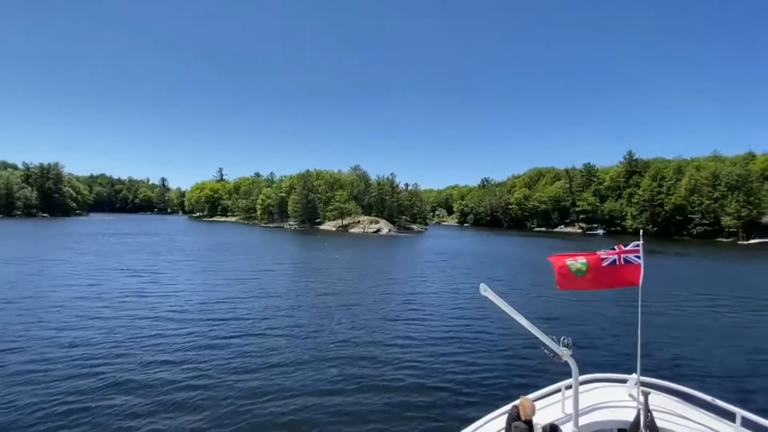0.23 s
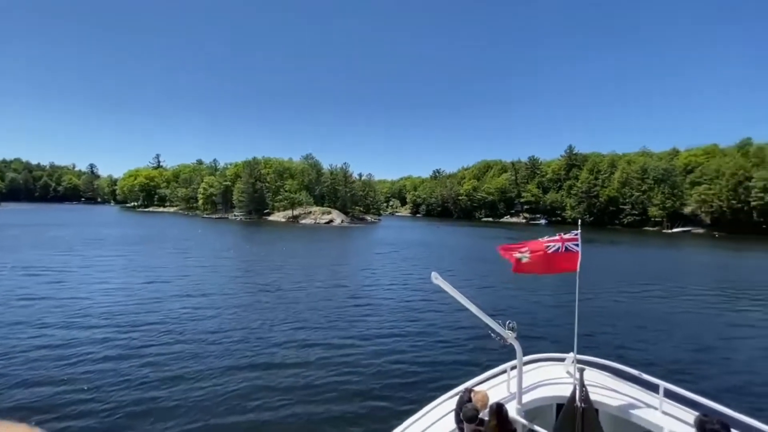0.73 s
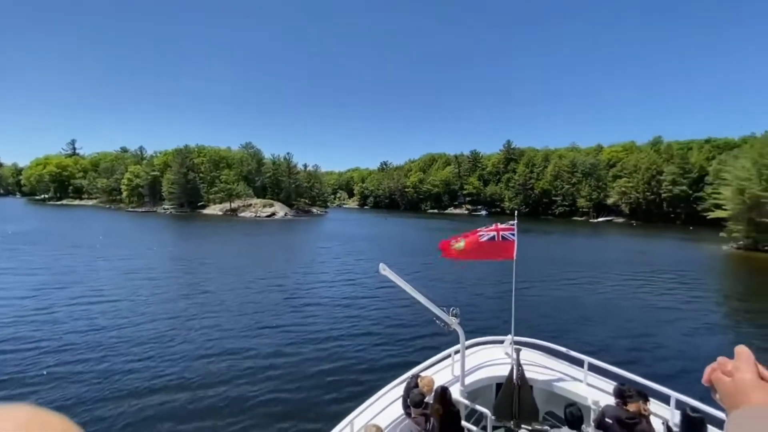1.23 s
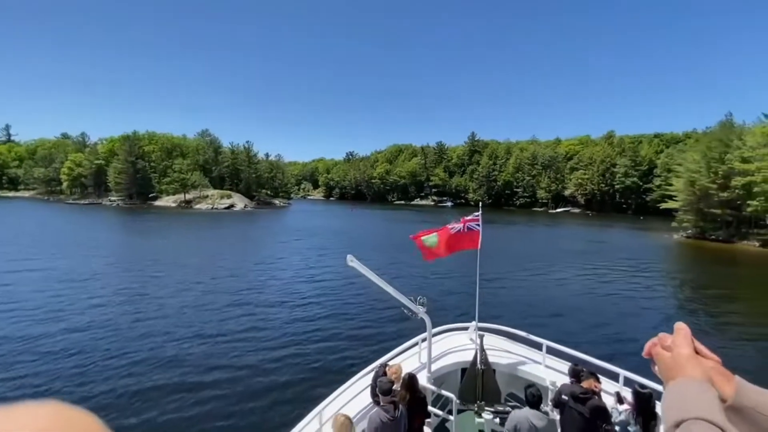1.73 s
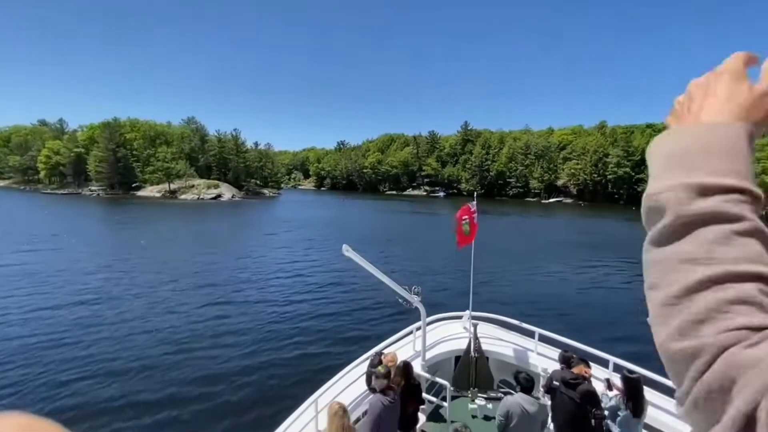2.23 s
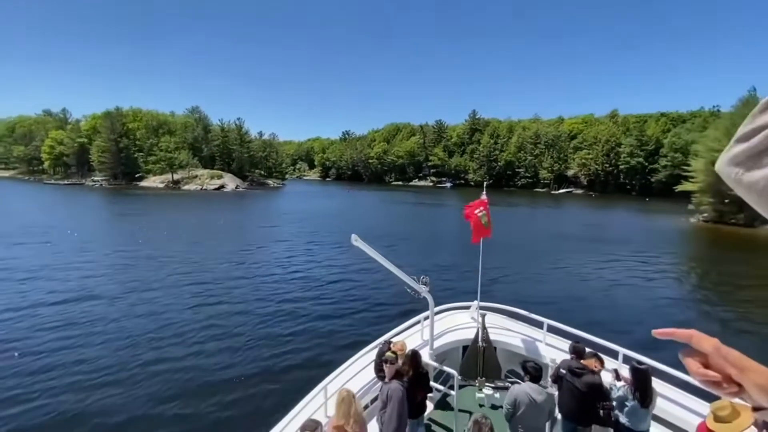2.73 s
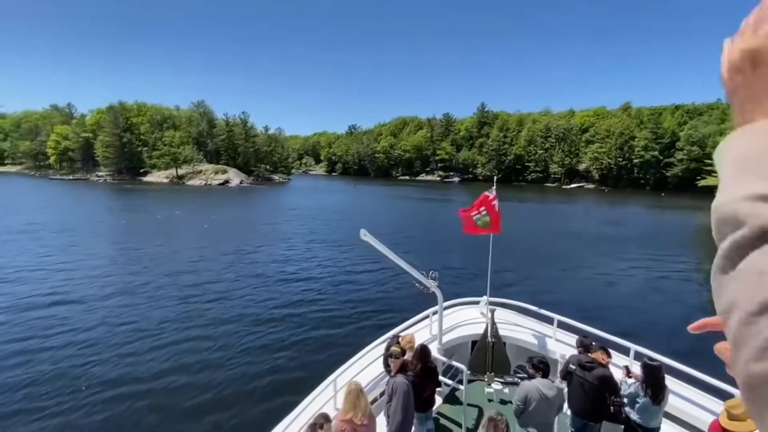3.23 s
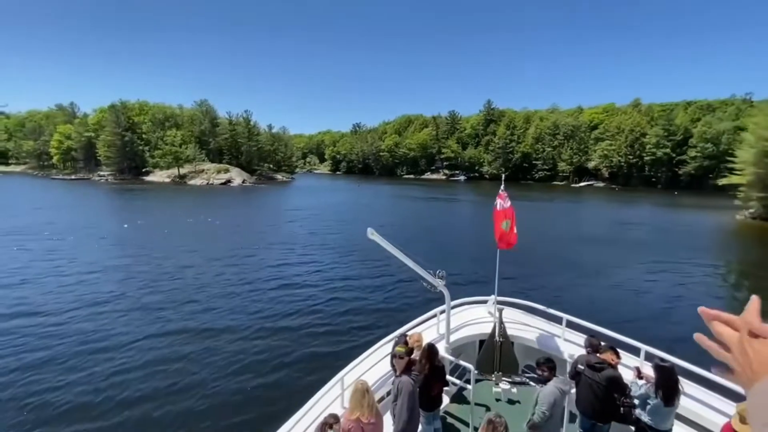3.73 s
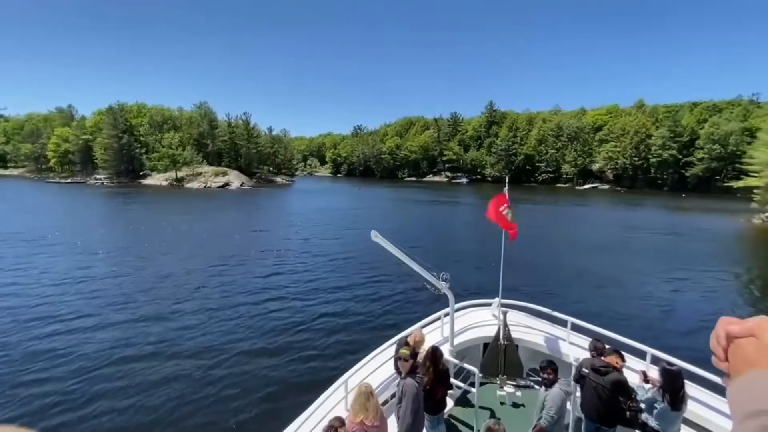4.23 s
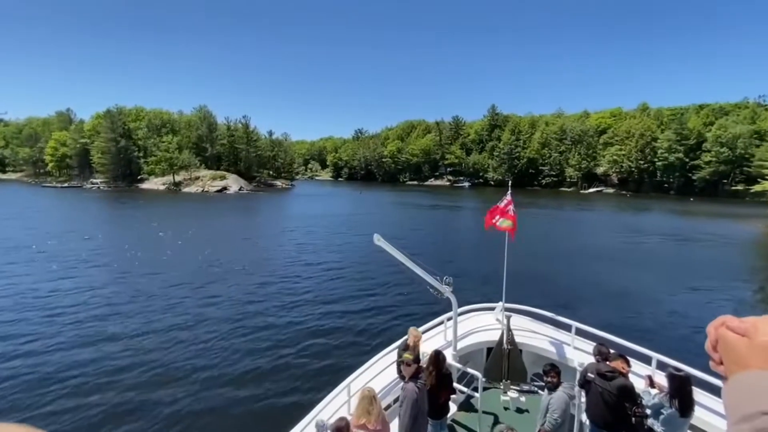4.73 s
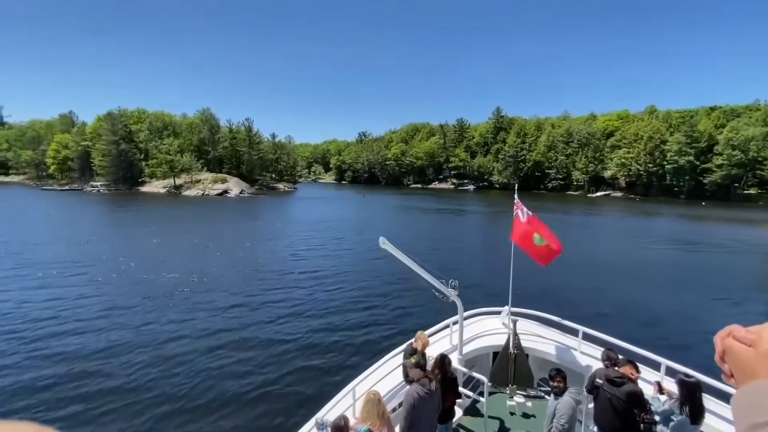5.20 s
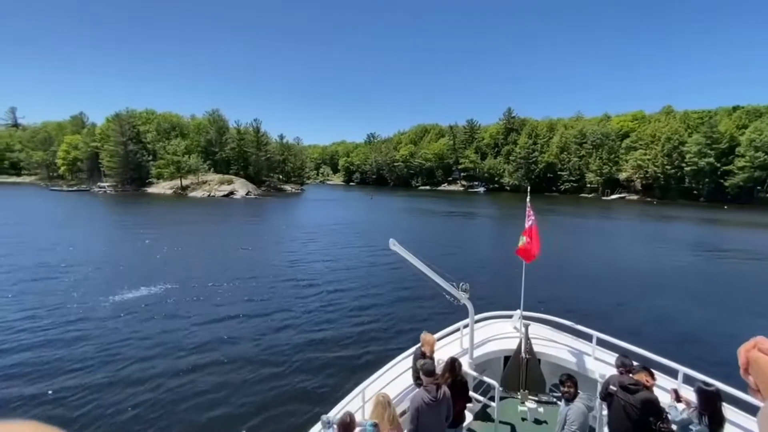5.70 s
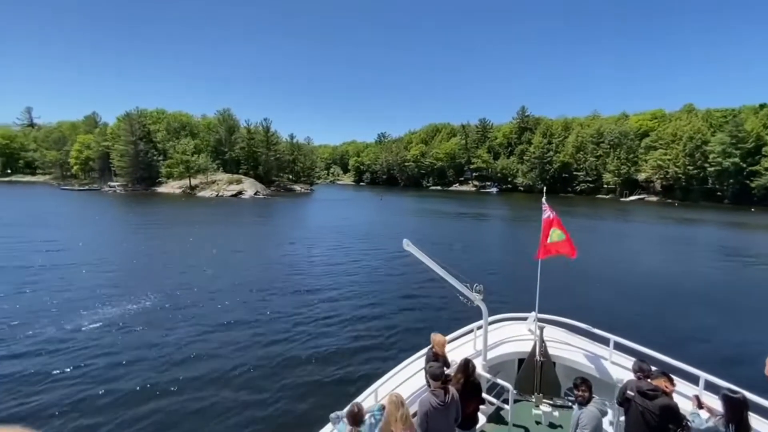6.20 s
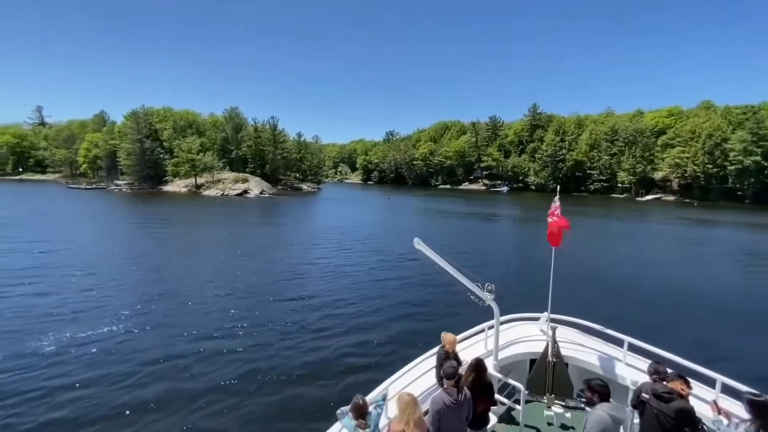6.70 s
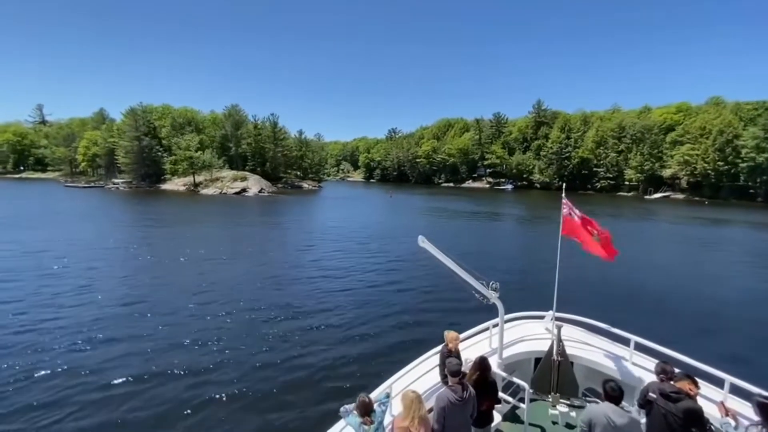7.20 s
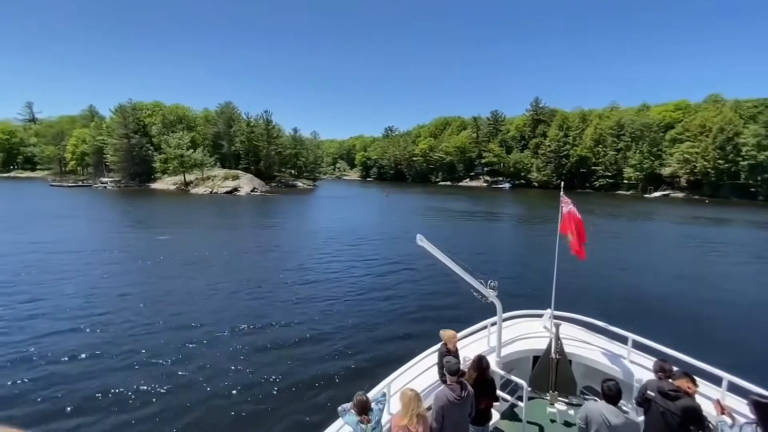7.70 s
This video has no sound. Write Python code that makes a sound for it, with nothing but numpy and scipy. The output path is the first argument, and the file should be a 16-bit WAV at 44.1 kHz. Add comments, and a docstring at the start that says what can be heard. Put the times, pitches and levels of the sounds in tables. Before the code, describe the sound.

A boat's air horn holds one long, loud, brassy chord over open water, with a light breeze on the microphone.

```python
"""From the start, a three-trumpet air horn holds one long chord on a tour boat crossing a lake.
Each trumpet sounds a stack of pure tones (partials); in the loud air they breed sum tones and steepen into
rasping shocks that scatter off the deck, while compressed air rushes underneath. The listener turns and the
treble moves in from the left. A breeze gusts on the microphone, and at 2.2 s a sleeve brushes by. The blast
slowly loses its edge. The whole sound skips for an instant at 7.5 s, with a tick and a dull knock."""
import sys
import numpy as np
from scipy import signal
from scipy.fft import rfft, irfft, next_fast_len
from scipy.io import wavfile
from scipy.ndimage import map_coordinates

SR = 44100
rng = np.random.default_rng(int(sys.argv[2]) if len(sys.argv) > 2 else 0)


def unload_audio(sound):
    """Save the sound as a 16-bit wav file, at the path given as the first command line argument."""
    columns = np.transpose(np.atleast_2d(sound))
    # keep every value between -1 and 1, then stretch to whole-number steps
    steps = np.round(np.clip(columns, -1, 1) * 32767)
    wavfile.write(sys.argv[1], SR, steps.astype(np.int16))


N = 350595
TIME = np.arange(N) / SR


def from_db(db):
    """Turn decibels into a number to multiply by."""
    return np.exp(np.asarray(db) * (np.log(10) / 20))


def rms_one(x):
    """Scale a sound so that its average power is 1."""
    return x / np.sqrt(np.mean(x ** 2) + 1e-20)


def in_time(rows):
    """Join a table's points with straight lines: one value per sample for each column after the time."""
    times, *columns = np.transpose(rows)
    return [np.interp(TIME, times, column) for column in columns]


def swing(curve):
    """How many dB a level curve lies above its own average power, at every sample."""
    db, = in_time(curve)
    return db - 10 * np.log10(np.mean(from_db(db) ** 2))


def pan(balance_db):
    """Left and right gains that keep the average power; a positive balance favours the left."""
    return rms_one(from_db([[balance_db / 2], [-balance_db / 2]]))


def drift(rate):
    """A smooth random wobble of typical size 1 that changes about `rate` times a second."""
    pole = np.exp(-200 * np.pi * rate / SR)
    noise = rng.standard_normal(N // 100 + 2002)   # one value per 100 samples, plus a run-up
    slow = signal.lfilter([1], [1, -2 * pole, pole * pole], noise)[2000:]
    return np.interp(np.arange(N) / 100, np.arange(len(slow)), rms_one(slow))


def coloured(x, spectrum):
    """Turn each frequency up or down as a table says, then scale to power 1."""
    size = next_fast_len(N)
    hz, db = np.transpose(spectrum)
    bin_hz = np.maximum(np.arange(size // 2 + 1) * SR / size, 1)
    gain = from_db(np.interp(np.log(bin_hz), np.log(hz), db))
    return rms_one(irfft(rfft(x, size) * gain, size)[..., :N])


def stereo_noise(likeness):
    """Hiss for two ears: unrelated at likeness 0, the same at 1."""
    mid, side = rng.standard_normal((2, N))
    return np.sqrt(1 + likeness) * mid + np.sqrt(1 - likeness) * side * np.array([[1], [-1]])


# gusts and lulls: t/s, relative level/dB
BREEZE_LEVEL = [(0.0, -61), (0.04, -60), (1.63, -59), (1.65, -34), (1.74, -74), (1.85, -57), (2.0, -79),
                (2.04, -57), (2.31, -52), (2.4, -67), (2.66, -44), (2.73, -50), (3.04, -55.5), (3.14, -62),
                (3.25, -47), (3.3, -63), (4.35, -56), (4.38, -41), (4.44, -60), (4.71, -54), (4.75, -68),
                (5.85, -66), (5.9, -55), (6.07, -65), (6.97, -62.5), (7.02, -82), (7.08, -70), (7.9, -68)]
# the breeze's deep tone: f/Hz, relative level/dB
BREEZE_COLOUR = [(15, 4), (30, -9), (60, 13), (100, 7), (160, -10), (400, -24.5), (1000, -65), (4000, -110)]

def breeze(eddy_db=4, eddies_per_s=8):
    """Wind bumps against the microphone; little swirls make it flicker at random."""
    gust_db, = in_time(BREEZE_LEVEL)
    flow = from_db(gust_db + 1.5 + eddy_db * drift(eddies_per_s))
    return flow * pan(balance_db=2.5) * coloured(stereo_noise(likeness=0.066), BREEZE_COLOUR)


# how loud the gusts rumble: t/s, level/dB
RUMBLE_LEVEL = [(0, -76), (1.9, -68), (2.2, -53), (2.7, -54), (3.3, -67), (4.0, -56), (4.4, -46.5),
                (5.0, -58), (5.5, -80), (7.9, -78)]
# the rumble's tone: f/Hz, relative level/dB
RUMBLE_COLOUR = [(60, -21), (120, 0.5), (170, 5), (300, -11), (1000, -74), (4000, -110)]

def gust_rumble():
    """The stronger gusts also rumble just below the chord."""
    db, = in_time(RUMBLE_LEVEL)
    return from_db(db) * coloured(stereo_noise(likeness=0.14), RUMBLE_COLOUR)


def bursts(peaks, fade_s):
    """A loudness curve that rises to each (time, dB) peak and falls away just as fast."""
    return sum(from_db(db) * np.exp(-np.abs(TIME - at_s) / fade_s) for at_s, db in peaks)


# the sleeve's swish and its two ticks: t/s, level/dB
SLEEVE_SWISH = [(2.235, -46)]
SLEEVE_TICKS = [(2.248, -30), (2.258, -36)]
# the tone of cloth: f/Hz, relative level/dB
CLOTH_COLOUR = [(2000, -11), (4500, -3.5), (7500, -17), (10000, -18), (11500, -70)]

def sleeve():
    """Cloth brushes by, a little to the right, and ticks softly as it passes."""
    swish = bursts(SLEEVE_SWISH, fade_s=.033) * coloured(stereo_noise(likeness=0.89), CLOTH_COLOUR)
    ticks = bursts(SLEEVE_TICKS, fade_s=.0009) * coloured(stereo_noise(likeness=0.49), CLOTH_COLOUR)
    return pan(balance_db=-2.0) * swish + ticks


SKIP_S = 7.489

def skip(phases, jump_cycles=(-.06, .15, .18)):
    """The sound skips for an instant: all three notes jump by part of a cycle, heard as a tick."""
    return [phase + 2 * np.pi * jump * (TIME > SKIP_S) for phase, jump in zip(phases, jump_cycles)]


# the knock's dull tone: f/Hz, relative level/dB
KNOCK_COLOUR = [(30, -22), (120, -14), (250, 0), (600, -2), (1300, -10), (3000, -40), (12000, -80)]

def knock(level_db=-27):
    """A soft, dull knock is heard as the whole sound skips."""
    return bursts([(SKIP_S, level_db)], fade_s=.003) * coloured(stereo_noise(likeness=0.9), KNOCK_COLOUR)


# the tone of the rushing air: f/Hz, relative level/dB
AIR_COLOUR = [(100, -30), (190, 0), (450, -1), (620, 1.5), (730, -3), (1000, -.5), (1400, -9), (2100, -16),
              (2650, -13.5), (3000, -23.5), (4400, -21.5), (6500, -22.5), (8500, -28), (10000, -31),
              (11300, -55), (12500, -85)]

def rushing_air(rasp_swing_db, level_db=-37, follows=0.29):
    """Compressed air rushes under the chord, partly following the rasp's rise and fall."""
    rush = coloured(stereo_noise(likeness=0.034), AIR_COLOUR)
    return from_db(level_db + follows * rasp_swing_db) * rush


# the echo off a hard surface nearby: delay/s, relative level/dB
DECK_ECHOES = [(.0023, -12.5)]

def deck(x, ring_s=0.048, tail_count=4, sways_per_s=15):
    """Add a close echo and a blur of echoes off rails and cabin, whose paths sway with the moving air."""
    age = TIME[:SR // 8]
    out = x + sum(from_db(db) * np.interp(TIME - delay, TIME, x, left=0) for delay, db in DECK_ECHOES)
    shares = np.array([drift(sways_per_s) for _ in range(tail_count)])
    for share in shares / np.linalg.norm(shares, axis=0):
        tail = rng.standard_normal((2, len(age))) * from_db(-60 * age / ring_s)
        tail /= np.linalg.norm(tail, axis=1, keepdims=True)
        out = out + share * signal.oaconvolve(x[None], tail, axes=1)[:, :N]
    return out


def rail(x, echo_db=-10, delay_s=.0009, sway_s=.00008):
    """Add the rail's weak echo; its path changes as the listener moves, shifting the tone. Power 1."""
    echo = [np.interp(TIME - delay_s - sway_s * drift(.5), TIME, side, left=0) for side in x]
    return rms_one(x + from_db(echo_db) * np.array(echo))


def shocks(phase, strength):
    """One sharp jolt of pressure per cycle, shared between the two nearest samples."""
    cycles = phase / (2 * np.pi)
    whole_cycles = np.arange(np.ceil(cycles[0]), cycles[-1])
    position = np.interp(whole_cycles, np.maximum.accumulate(cycles), np.arange(N))
    position = position[position < N - 1]
    sample, fraction = position.astype(int), position % 1
    out = np.zeros(N)
    out[sample] = strength[sample] * (1 - fraction)
    out[sample + 1] = strength[sample] * fraction
    return out


# the rasp's bright tone: f/Hz, relative level/dB
RASP_COLOUR = [(1000, -36), (1700, 19), (2500, 16.5), (2950, 10), (3400, 5.5), (4400, 12.5), (5500, 5.5),
               (6600, 8.5), (7600, 2), (8400, 0.5), (10000, -41.5), (11300, -54), (12500, -75.5)]

def rasp(low, middle, push, level_db=-40.5, throb_db=5.5, rough_db=1.2, middle_db=-14):
    """Shocks buzz and echo; the low trumpet's grow when they ride a pressure crest of the other two."""
    wavering_gain = from_db(level_db + .25 * drift(5.5))
    strength = from_db(throb_db * push + rough_db * drift(70))
    low_shocks = shocks(low + .006 * drift(25), strength)
    middle_shocks = from_db(middle_db) * shocks(middle, from_db(rough_db * drift(30)))
    return wavering_gain * rail(coloured(deck(low_shocks + middle_shocks), RASP_COLOUR))


# the low trumpet's highest partials: multiple of its pitch, relative level/dB at the start, at the end
BLARE_PARTIALS = [(14, -56.5, -63.5), (15, -56, -58), (16, -50.5, -68), (17, -60, -69.5), (18, -51.5, -71),
                  (19, -67.5, -71.5), (20, -58, -65), (21, -66, -68), (22, -65.5, -67), (23, -69, -83.5),
                  (24, -58, -67), (25, -74, -63.5), (26, -59, -68.5), (28, -63, -79.5), (29, -67, -69.5),
                  (30, -64.5, -75.5), (31, -56, -61), (33, -77, -74)]

def blare(phase, flutter_db=2.0, trim_db=-0.7):
    """The brassy edge: high partials that stand above the rasp and shimmer in the moving air."""
    out = np.zeros((2, N))
    for multiple, start_db, end_db in BLARE_PARTIALS:
        db = np.linspace(start_db, end_db, N) + trim_db + flutter_db * drift(4)
        angle = multiple * phase + .5 * drift(5) + .8 * rng.standard_normal((2, 1))
        roughness = 1 + .2 * drift(22)
        out += np.sqrt(2) * from_db(db) * roughness * np.cos(angle)
    return out


# how the rasp and the sizzle on top of it fade: t/s, relative level/dB
RASP_LEVEL = [(0.05, -39), (1.1, -40), (2.0, -39.5), (2.4, -42), (2.65, -40), (3.3, -40.5), (4.1, -42.5),
              (5.0, -41.5), (6.0, -43), (7.05, -44.5), (7.65, -41.5), (7.9, -43.5)]
SIZZLE_LEVEL = [(0.05, -32), (1.0, -34), (2.0, -35), (2.45, -57), (3.3, -40), (4.0, -37), (5.3, -44.5),
                (5.9, -38), (7.05, -43), (7.65, -41), (7.9, -41)]
# where the treble sits as the listener turns: t/s, left over right/dB
TREBLE_SIDE = [(0, 7), (.6, 4), (1.3, 4.5), (1.8, 0), (2.3, 1.5), (2.7, 1), (4, 2), (7.9, 1.5)]

def treble(buzz, brass, sizzle_hz=5060):
    """The rasp fades, its sizzle faster; with the blare they move from the left towards the centre."""
    sizzle = signal.sosfiltfilt(signal.butter(3, sizzle_hz, "high", fs=SR, output="sos"), buzz)
    faded = from_db(swing(RASP_LEVEL)) * (buzz - sizzle) + from_db(swing(SIZZLE_LEVEL)) * sizzle
    side_db, = in_time(TREBLE_SIDE)
    return from_db(np.array([side_db, -side_db]) / 2) * (faded + brass)


# how the partials weaken during the blast: t/s, relative level/dB
PARTIAL_FADE = [(0.55, -36.5), (1.59, -35.5), (2.0, -36.5), (5.17, -37.5), (6.7, -39), (7.9, -38.5)]

def fading(phase, full_fade_hz=2390):
    """A partial's change of level in dB: the higher it is, the more it fades."""
    hz = (phase[-1] - phase[0]) / (2 * np.pi * TIME[-1])
    return swing(PARTIAL_FADE) * (hz / full_fade_hz) ** 0.11


# the pitches that add up to each sum tone: multiple of the low, of the middle, of the high trumpet
SUM_RECIPES = [(1, 1, 0), (0, 1, 1), (2, 2, 0), (3, 2, 0), (3, 0, 2), (4, 2, 0), (4, 0, 2)]
# each sum tone before fading and flutter: level/dB
SUM_LEVELS = [-52.5, -69, -43.5, -54.5, -48.5, -53, -53.5]

def sum_tones(phases, flutter_db=5.5):
    """Partials of two trumpets mix in the loud air and sound at the sum of their pitches."""
    out = np.zeros((2, N))
    for phase, db in zip(np.dot(SUM_RECIPES, phases), SUM_LEVELS):
        height = np.sqrt(2) * from_db(db + fading(phase) + flutter_db * drift(1.5))
        out += height * np.cos(phase + .6 * rng.standard_normal((2, 1)))
    return out


# how much sooner the left ear hears the horn: t/s, head start/s
LEFT_HEAD_START = [(0, .00016), (.75, .00005), (1.25, -.00002), (1.8, -.00009), (2.6, -.00006),
                   (4, -.00004), (5.3, -.00002), (6.6, .00001), (7.95, .00001)]

def listener_turn(x):
    """The listener turns, so the horn reaches one ear slightly before the other."""
    lead_s, = in_time(LEFT_HEAD_START)
    shift = lead_s * SR / 2
    return np.array([map_coordinates(side, [np.arange(N) + sign * shift], order=3, mode="nearest")
                     for side, sign in zip(x, (1, -1))])


# the three notes, creeping upwards: t/s, low f/Hz, middle f/Hz, high f/Hz
PITCHES = [(0, 211.3, 268.75, 328.05), (3, 211.57, 268.82, 328.8), (7.95, 211.85, 268.9, 329.6)]

def diaphragms(waver_hz=0.079):
    """A disc vibrates in each trumpet; gives each one's phase (cycles so far, in radians)."""
    return [2 * np.pi * np.cumsum(hz + waver_hz * drift(3.75)) / SR for hz in in_time(PITCHES)]


def trumpet(phase, partials, swells, flutter_db=.7, shimmer=.05):
    """A stack of partials fluttering in the moving air; some swell on their own, the rest fade together."""
    out = np.zeros((2, N))
    for multiple, db, balance_db, lead in partials:
        change_db = swing(swells[multiple]) if multiple in swells else fading(multiple * phase)
        flutter = from_db(flutter_db * np.sqrt(multiple) / 2 * np.array([drift(1.7), drift(2.7)]))
        roughness = 1 + shimmer * multiple / 2 * drift(63)   # from the air stream
        height = np.sqrt(2) * from_db(db + change_db) * flutter * roughness
        angle = multiple * phase + 0.28 * rng.standard_normal()
        out += height * pan(balance_db) * np.sin(angle + np.array([[lead], [-lead]]) / 2)
    return out


# each trumpet's partials: multiple of its pitch, average level/dB, left over right/dB, left lead/radians
LOW_PARTIALS = [(1, -33.7, -1.2, -0.2), (2, -37.4, 1.9, -0.1), (3, -28.7, 14.9, -1.3),
                (4, -32.4, -3.3, -0.2), (5, -33.2, 3.1, 0.3), (6, -37.6, 2.1, -0.5), (7, -38.0, 0.2, -0.5),
                (8, -43.4, -1.1, -0.3), (9, -41.0, 0.5, -0.1), (10, -47.6, 2.7, -1.3),
                (11, -43.4, 1.3, -1.1), (12, -43.0, 0.0, -0.4), (13, -51.9, -2.1, -0.3)]
MIDDLE_PARTIALS = [(1, -31.7, -0.2, -0.3), (2, -28.3, -8.1, -1.0), (3, -31.5, -4.6, -0.9),
                   (4, -36.0, 2.5, 0.1), (5, -40.3, 5.2, -0.5), (6, -45.0, 0.2, -0.8),
                   (7, -44.8, 0.9, -0.2), (8, -52.4, 2.5, -0.7), (9, -58.0, -1.3, -0.3),
                   (10, -55.9, 2.6, -0.0), (12, -62, 1, 0)]
HIGH_PARTIALS = [(1, -30.4, -2.8, 0.3), (2, -32.6, 8.9, -1.0), (3, -35.4, -1.1, 0.1), (4, -41.0, 2.5, -0.1),
                 (5, -58.5, -1.2, -0.1)]
# each trumpet's lowest partial swells and sinks as the listener turns: t/s, relative level/dB
BASE_SWELL = [(0.05, -28), (0.53, -28), (2.3, -26.5), (3.0, -28.5), (6.41, -29), (7.9, -28.5)]
# swells of single partials, named by trumpet and multiple: t/s, relative level/dB
LOW_2ND = [(0.05, -61), (0.27, -33.5), (0.64, -47.5), (0.7, -33), (1.88, -55), (2.39, -33), (5.3, -35),
           (6.83, -29), (7.9, -33)]
LOW_3RD = [(0.05, -48), (0.07, -34), (1.32, -33), (2.02, -37.5), (3.28, -33), (7.77, -36.5), (7.9, -35.5)]
LOW_9TH = [(0.05, -40), (0.75, -41.5), (1.67, -41.5), (4.05, -41), (5.51, -43.5), (5.87, -40.5),
           (6.02, -44), (7.9, -46)]
LOW_12TH = [(0.05, -50.5), (0.9, -38.5), (1.75, -28.5), (2.0, -37), (4.7, -37.5), (5.1, -41), (7.9, -43.5)]
MIDDLE_2ND = [(0.05, -32.5), (0.62, -35.5), (1.88, -27), (3.44, -25.5), (7.39, -31), (7.9, -33.5)]
MIDDLE_3RD = [(0.05, -31.5), (0.84, -31.5), (2.24, -35), (2.96, -35), (3.05, -32.5), (7.37, -36),
              (7.9, -35)]

def air_horn(phases, bell_cut_hz=150):
    """Three trumpets sound a chord so loud that their waves push on one another and rasp."""
    low, middle, high = phases
    # sound runs faster on a pressure crest: the upper trumpets' octaves push the low one's waves about
    push = np.cos(2 * middle) + .12 * np.cos(2 * high)
    nudged_low = low + .017 * push
    low_swells = {1: BASE_SWELL, 2: LOW_2ND, 3: LOW_3RD, 9: LOW_9TH, 12: LOW_12TH}
    chord = (trumpet(nudged_low, LOW_PARTIALS, low_swells)
             + trumpet(middle, MIDDLE_PARTIALS, {1: BASE_SWELL, 2: MIDDLE_2ND, 3: MIDDLE_3RD})
             + trumpet(high, HIGH_PARTIALS, {1: BASE_SWELL})
             + sum_tones(phases))
    # the trumpets' flared ends give out nothing far below their lowest note
    chord = signal.sosfiltfilt(signal.butter(6, bell_cut_hz, "high", fs=SR, output="sos"), chord)
    buzz = rasp(low + .03 * push, middle, push)
    return chord + treble(buzz, blare(nudged_low))


def scene():
    """Breeze, a sleeve, rushing air and the horn; near the end the sound skips with a tick and a knock."""
    phases = skip(diaphragms())
    horn = listener_turn(air_horn(phases))
    return breeze() + gust_rumble() + sleeve() + knock() + rushing_air(swing(RASP_LEVEL)) + horn


def record(dry, cutoff_hz=16000):
    """Cut away the very highest treble."""
    return signal.sosfilt(signal.ellip(10, .1, 80, cutoff_hz, fs=SR, output="sos"), dry)


dry = scene()
out = record(dry)
unload_audio(out)
```